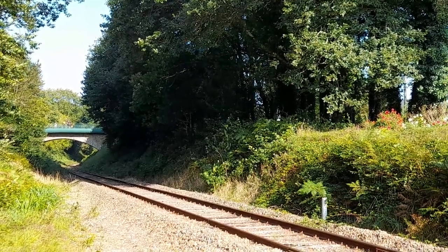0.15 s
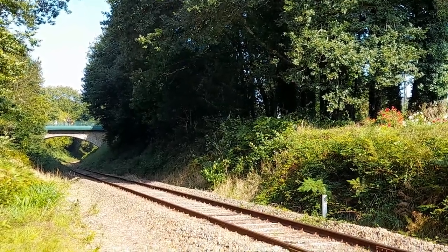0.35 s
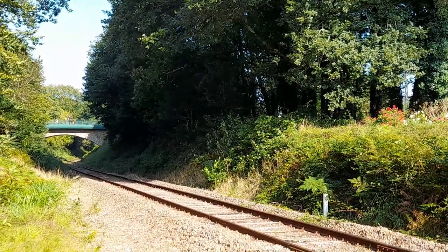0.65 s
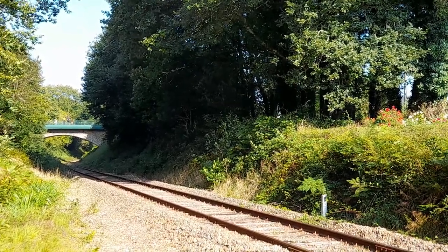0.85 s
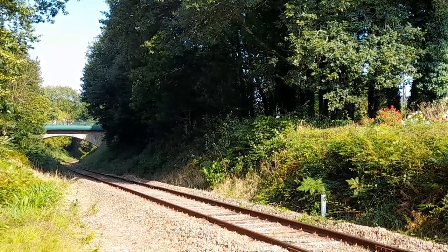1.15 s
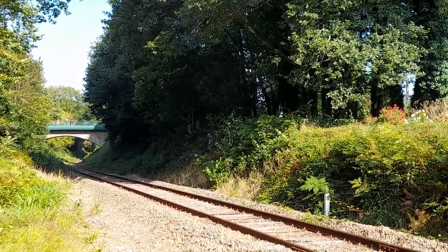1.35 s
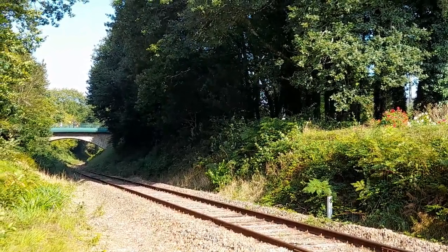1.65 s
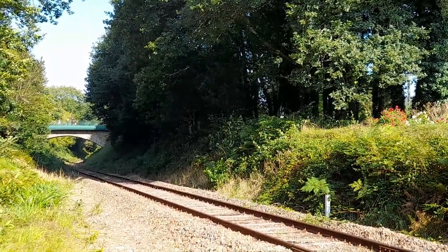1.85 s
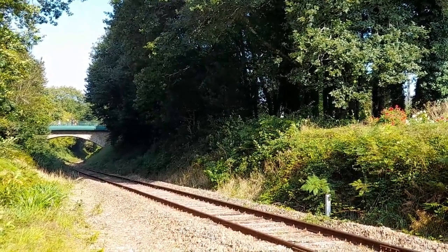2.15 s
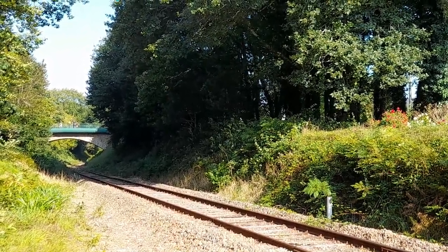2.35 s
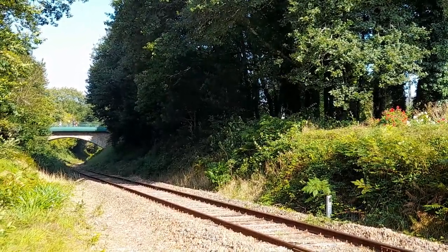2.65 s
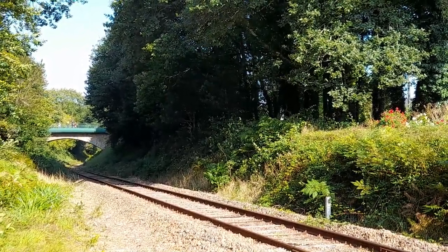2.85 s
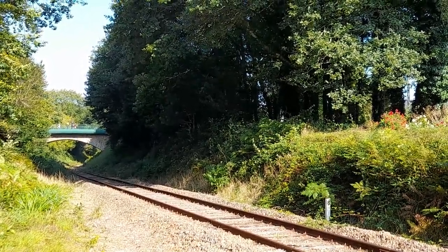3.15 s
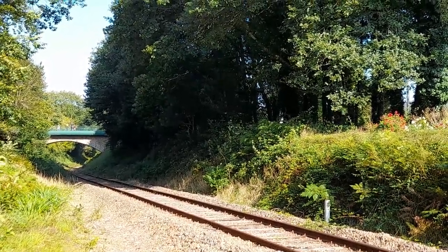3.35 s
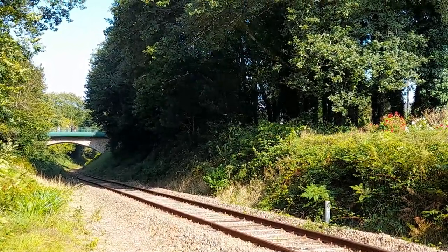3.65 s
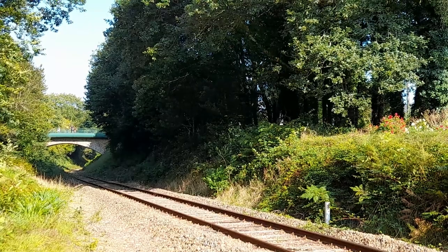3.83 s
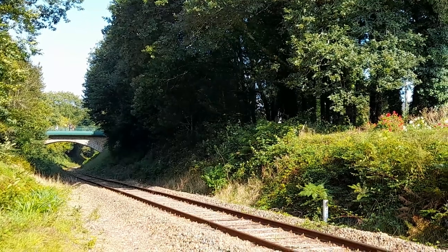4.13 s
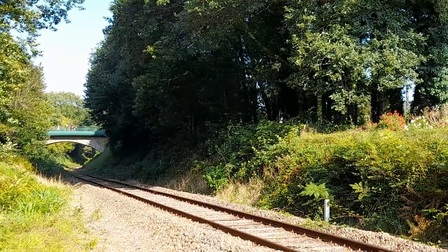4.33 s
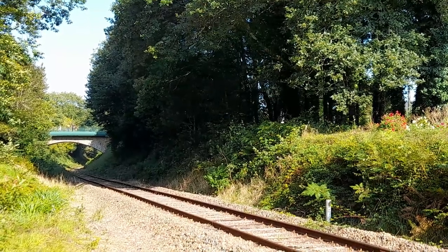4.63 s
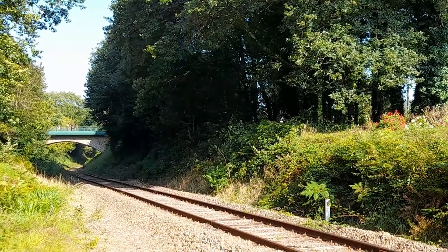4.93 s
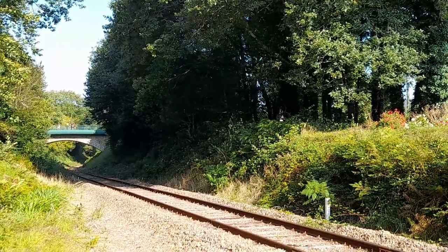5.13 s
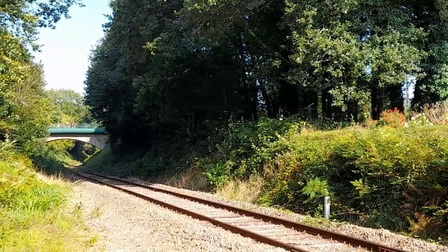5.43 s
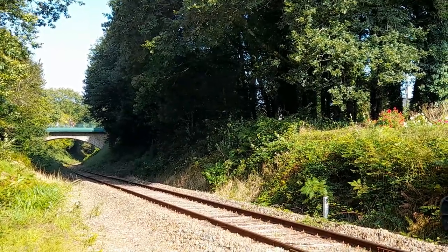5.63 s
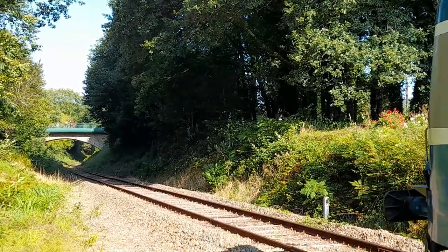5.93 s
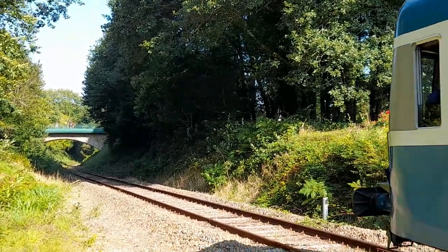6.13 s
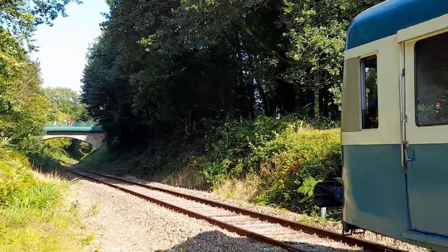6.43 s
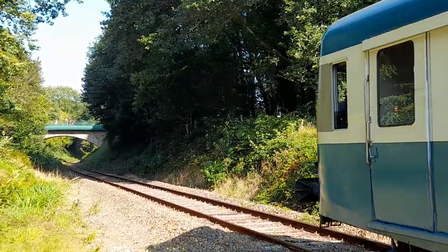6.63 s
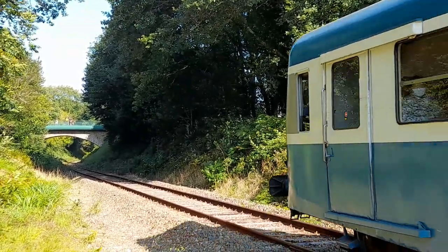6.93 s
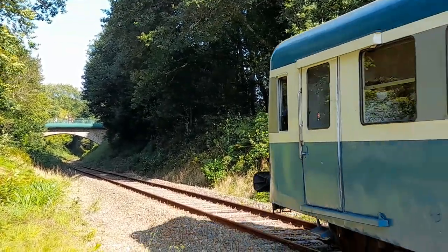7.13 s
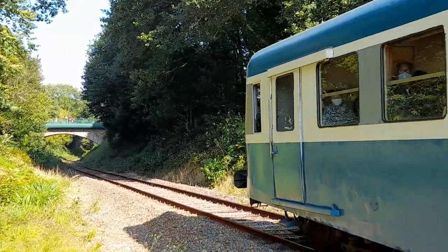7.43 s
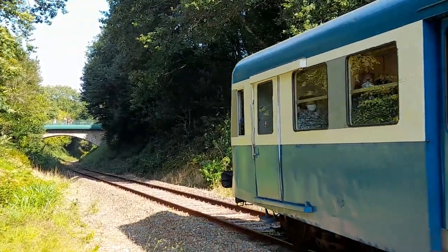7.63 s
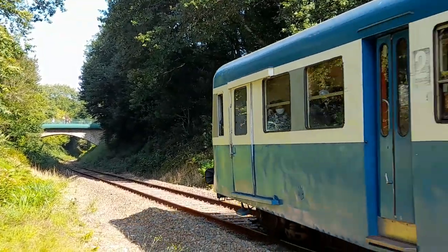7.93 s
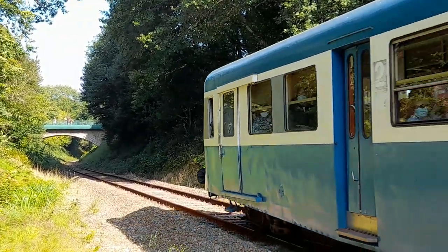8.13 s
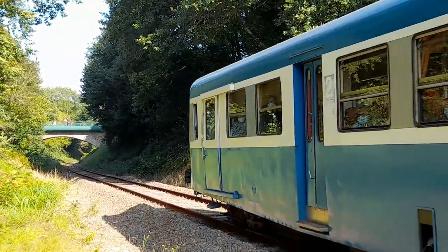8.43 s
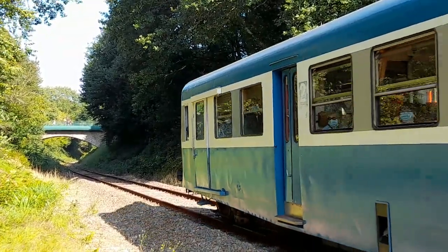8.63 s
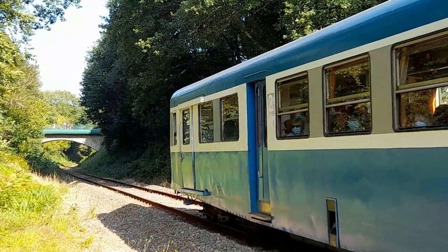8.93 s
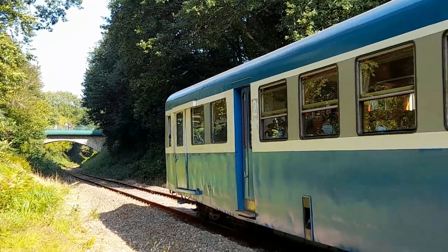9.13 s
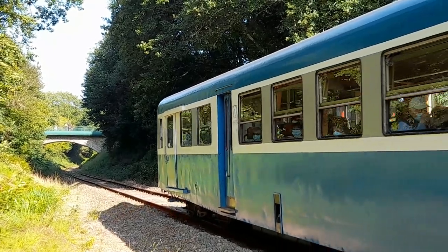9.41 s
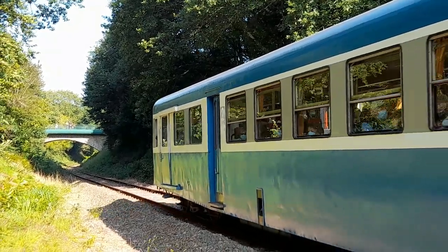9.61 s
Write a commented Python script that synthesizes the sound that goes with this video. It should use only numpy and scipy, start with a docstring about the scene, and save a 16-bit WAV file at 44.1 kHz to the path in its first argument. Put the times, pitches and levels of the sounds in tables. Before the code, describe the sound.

A diesel train approaches at idle, surges into power and rolls by with booming exhaust, humming panels and rattling metal.

```python
"""An old diesel railcar creeps up from behind and rolls past, close to a rural track lined with trees.
Its twelve cylinders knock unevenly at low load, each firing ringing the block and the exhaust pipe.
At four seconds it takes power: the exhaust booms, the turbocharger whistles higher, body panels hum
and the cooling fan starts to drone. Wheels rumble on rough rails, flanges rasp and loose metal clinks;
early gusts touch the microphone."""
import sys
import numpy as np
from scipy import signal
from scipy.fft import rfft, irfft, next_fast_len
from scipy.io import wavfile
from scipy.ndimage import uniform_filter1d

SR = 44100
rng = np.random.default_rng(int(sys.argv[2]) if len(sys.argv) > 2 else 0)


def wav_record(signal):
    """Record a signal, one row per channel, as 16-bit PCM in the file named by sys.argv[1]."""
    frames = np.transpose(np.atleast_2d(signal))
    bounded = np.clip(frames, -1, 1)
    # unit amplitude maps onto the largest positive 16-bit level
    quanta = np.round(bounded * 32767).astype(np.int16)
    wavfile.write(sys.argv[1], SR, quanta)


N = 430857
TIME = np.arange(N) / SR
SPEED_M_PER_S, NOSE_ABREAST_S = 4, 5
# cylinders in firing order: idle level/dB, loaded level/dB, lateness/firing intervals
CYLINDERS = [(0, -5, .13), (-5.5, -16, 0.18), (-17, -9.5, 0.11), (-10, -9, 0.11), (-2, -2, 0.2013),
             (-11, -2, 0.16), (-20, -14, 0.048), (-19.5, -19, 0.243), (-10.5, -4.5, 0.269), (-7, -10, 0.22),
             (-16.5, -14.5, 0.263), (-34.5, -11.5, .15)]


def from_db(db):
    return 10 ** (np.asarray(db) / 20)


def rms_one(x):
    return x / np.sqrt(np.mean(x ** 2) + 1e-20)


def in_time(rows):
    """Each column of a breakpoint curve at every sample."""
    times, *columns = np.transpose(rows)
    return [np.interp(TIME, times, column) for column in columns]


def swell(s, length):
    """A bell-shaped rise and fall that peaks at s."""
    return np.exp(-.5 * ((TIME - s) / length) ** 2)


def drift(rate_hz):
    """Smooth random modulation, spread 1."""
    step, settle = 40, 2000
    pole = np.exp(-2 * np.pi * rate_hz * step / SR)
    noise = rng.standard_normal(N // step + settle + 2)
    slow = signal.lfilter([1], [1, -2 * pole, pole * pole], noise)[settle:]
    return np.interp(np.arange(N) / step, np.arange(len(slow)), rms_one(slow))


def breathy(angle, blur_hz):
    """A tone whose strength and phase wander."""
    return drift(blur_hz) * np.sin(angle) + drift(blur_hz) * np.cos(angle)


def colour(x, spectrum):
    """EQ by a curve of (f/Hz, level/dB), rolling off beyond its ends; rms 1."""
    size = next_fast_len(N)
    hz, db = np.transpose(spectrum)
    bins = np.maximum(np.fft.rfftfreq(size, 1 / SR), 1)
    curve = from_db(np.interp(np.log(bins), np.log(hz), db))
    skirts = np.minimum(1, bins / hz[0]) ** 2 * np.minimum(1, hz[-1] / bins) ** 2
    return rms_one(irfft(rfft(x, size) * curve * skirts, size)[..., :N])


def resonate(x, modes, ratio=-1):
    """Parallel modes (f/Hz, width/Hz, level/dB), the kth times ratio**k; positive firms the attack."""
    out = 0
    for k, (hz, width, db) in enumerate(modes):
        r = np.exp(-np.pi * width / SR)
        ring = signal.lfilter([1, 0, -1], [1, -2 * r * np.cos(2 * np.pi * hz / SR), r * r], x)
        out = out + ratio ** k * from_db(db) * (1 - r * r) / 2 * ring
    return out


def ports(x):
    """Sound from the right reaches the left microphone port later."""
    # delay of the left port: t/s, lag/ms
    port_lag = [(0, 0.27), (5.4, 0.33), (7, 0.32), (9.77, 0.46)]
    lag_ms, = in_time(port_lag)
    return np.array([np.interp(TIME - lag_ms / 1000, TIME, x), x])


def wide_noise(direct):
    """Stereo white noise: a direct share of the power, the rest scattered."""
    focused = ports(rng.standard_normal(N))
    return np.sqrt(direct) * focused + np.sqrt(1 - direct) * rng.standard_normal((2, N))


def trees(x, t60, wet_db):
    """Direct sound plus a short scatter from the bank and the trunks."""
    t = TIME[:SR // 2]
    tail = rng.standard_normal((2, len(t))) * from_db(-60 * t / t60) * (t > .008)
    tail /= np.sqrt(np.sum(tail ** 2, axis=1, keepdims=True))
    return ports(x) + from_db(wet_db) * signal.fftconvolve(x[None], tail, axes=1)[:, :N]


def past(behind_m):
    """Metres by which a point behind the nose has gone past the microphone."""
    return SPEED_M_PER_S * (TIME - NOSE_ABREAST_S) - behind_m


def passing(behind_m, reach_m):
    """Pass-by gain: 1 when abreast, half the power at its reach, then falling with distance."""
    return 1 / np.hypot(1, past(behind_m) / reach_m)


def effort(load, idle_db, power_db):
    """Crossfade of gain from idle to full power."""
    return from_db(idle_db) * (1 - load) + from_db(power_db) * load


def surge(hold_s, start_s=4.02, attack_s=0.085, release_s=0.28):
    """Envelope of the engine's surge as the throttle opens, 0-1."""
    corners = start_s + np.cumsum([0, attack_s, hold_s, release_s])
    return np.interp(TIME, corners, [0, 1, 1, 0]) ** 2


def build_up(load, lag_s):
    """Boost and fan drive creep up after the load."""
    pole = np.exp(-1 / (lag_s * SR))
    return signal.lfilter([1 - pole], [1, -pole], load)


def firings(firing_count, load, uneven_db):
    """One click per firing; each cylinder has its own strength and path down the manifold."""
    number = np.arange(np.ceil(firing_count[0]), np.floor(firing_count[-1]) - 1)
    idle_db, loaded_db, late = np.array(CYLINDERS)[number.astype(int) % len(CYLINDERS)].T
    at = np.minimum(np.searchsorted(firing_count, number + late), N - 1)
    level_db = idle_db + (loaded_db - idle_db) * load[at]
    clicks = np.zeros(N)
    clicks[at] = from_db(level_db + uneven_db * rng.standard_normal(len(at)))
    return clicks


def puffs(clicks, decay_s):
    """The envelope of bursts that die away after each click; rms 1."""
    return rms_one(signal.lfilter([1], [1, -np.exp(-1 / (decay_s * SR))], clicks))


def combustion(clicks, modes, turbulence_db, band_hz):
    """Pulses and their puffs of gas ring a set of resonances; the casing passes only the middle band."""
    gas = from_db(turbulence_db) * puffs(clicks, decay_s=0.011) * rng.standard_normal(N)
    casing = signal.butter(2, band_hz, "band", fs=SR, output="sos")
    rung = signal.sosfilt(casing, resonate(rms_one(clicks) + gas, modes, ratio=0.77))
    return rung / np.sqrt(uniform_filter1d(rung ** 2, size=SR // 2) + 1e-12)  # even out the level


def knock(clicks, boost):
    """The block knocks hard at idle and softens as the boost builds."""
    # engine block resonances: f/Hz, width/Hz, level/dB
    block = [(278, 22, 0), (325.5, 30, -2), (381, 24, 6.5), (402, 70, -7), (487, 12, 8), (620, 20, -9),
             (650, 14, -2), (741.5, 6.9, 7)]
    # the hardest knocks before the throttle opens: t/s, accent/dB
    hard_knocks = [(.415, 0), (2.205, 3.5), (3.03, 1), (3.443, 2.5), (3.582, 1), (3.72, 1.5), (3.766, 5.5),
                   (3.996, 4.5)]
    accents = from_db(sum(db * swell(s, .012) for s, db in hard_knocks))
    gain = accents * effort(boost, idle_db=-32.5, power_db=-45) * passing(behind_m=28.4, reach_m=24.4)
    knocks = combustion(clicks, block, turbulence_db=-10, band_hz=[262, 600])
    return trees(gain * knocks, t60=0.34, wet_db=-16)


def bark(clicks, load):
    """The exhaust pipe speaks up under load, and roars with a rush of gas in the surge."""
    # exhaust pipe resonances: f/Hz, width/Hz, level/dB
    pipe = [(245, 240, -25), (292.5, 25, 3.5), (335, 96, 1), (396, 52, 0), (498, 22, -9.5),
            (648, 190, -16.5)]
    # EQ of the rushing gas: f/Hz, level/dB
    roar_eq = [(220, -31), (275, -1), (330, -7), (410, -5), (500, -13), (720, -21), (900, -25)]
    gain = effort(load, idle_db=-53, power_db=-35) * passing(behind_m=6.2, reach_m=6.4)
    gain += from_db(-36) * surge(hold_s=0.13)
    roar = from_db(-30.5) * surge(hold_s=0.099) * colour(wide_noise(direct=0.85), roar_eq)
    pulses = combustion(clicks, pipe, turbulence_db=-4, band_hz=[219, 604])
    return trees(gain * pulses, t60=0.34, wet_db=-6) + roar


def boom(firing_count, load):
    """The firing tone, loudest at the exhaust outlet: it stumbles at idle and steadies under load."""
    # brief dips in the tone: t/s, length/s, level/dB
    dips = [(.2, 1, -12), (3.8, 0.11, -7), (4.418, 0.022, -17), (5.23, 0.07, -6), (6.69, .02, -14),
            (8.256, 0.13, -10)]
    gain = effort(load, idle_db=-10, power_db=-12) * passing(behind_m=21.85, reach_m=2.77)
    gain += from_db(-25) * surge(hold_s=0.27)
    gain *= from_db(sum(db * swell(s, length) for s, length, db in dips))
    stumble = .42 - .3 * load
    angle = 2 * np.pi * firing_count
    return ports(gain * (np.sin(angle) + stumble * breathy(angle, blur_hz=21.9)))


def clatter(firing_count, load, uneven_db):
    """Injectors and tappets: a bright burst at every firing, over the rush of intake air."""
    # EQ of the clatter and the intake: f/Hz, level/dB
    clatter_eq = [(400, 4), (800, 4.5), (1200, -7.5), (1600, 2), (2100, 2), (3200, -4), (4200, -2.5),
                  (6000, -7.5), (7000, -14), (8000, -38.5), (10000, -21.5), (12500, -19.5), (16000, -26.5)]
    # engine bay resonances: f/Hz, width/Hz, level/dB
    bay_modes = [(1180, 267, 1), (1432, 380, -3.5), (2100, 180, -16.5), (3320, 250, -14),
                 (11700, 1400, -31.5)]
    fired = np.diff(np.floor(firing_count), prepend=np.floor(firing_count[0])) > 0
    clicks = fired * from_db(uneven_db * rng.uniform(-1, 1, N))
    bursts = rms_one(1 + puffs(clicks, decay_s=0.015))
    gain = effort(load, idle_db=-49.5, power_db=-47.5) * passing(behind_m=10.3, reach_m=17.8)
    # the surge draws a smooth gulp of air
    gulp = from_db(-46) * surge(hold_s=0.2) * colour(wide_noise(direct=0.15), clatter_eq)
    # the open bay rings with the bursts, loud only once it is alongside
    ringing = rms_one(resonate(wide_noise(direct=0.93) * bursts, bay_modes))
    bay = from_db(-43) * passing(behind_m=18.1, reach_m=5.4) * ringing
    return gain * colour(wide_noise(direct=0.17) * bursts, clatter_eq) + gulp + bay


def turbo(clicks, load, blur_hz, octave_blur_hz, throb):
    """The turbocharger's breathy whistle and its octave, throbbing with the exhaust pulses."""
    # whistle pitch as the turbo spools up: t/s, f/Hz
    spool = [(0.0, 4965), (3.89, 5066), (4.98, 5530), (6.07, 5810), (9.28, 6220), (9.77, 6290)]
    # swells of the airy octave: t/s, length/s, level/dB relative to the whistle
    airy_swells = [(5.9, 0.34, -14), (8.843, 0.66, -15)]
    hz, = in_time(spool)
    gain = effort(load, idle_db=-57, power_db=-54) * passing(behind_m=15.5, reach_m=22.3)
    gain += from_db(-54) * surge(hold_s=0.18)
    angle = 2 * np.pi * np.cumsum(hz) / SR
    octave = sum(from_db(db) * swell(s, length) for s, length, db in airy_swells)
    whistle = [breathy(angle, blur_hz) + octave * breathy(2 * angle, octave_blur_hz) for ear in range(2)]
    return gain * rms_one(1 + throb * puffs(clicks, decay_s=0.0066)) * np.array(whistle)


def wheels():
    """Rough rails shake the wheels and the body; the floor drums as the middle of the car goes by."""
    # EQ of the rolling rumble: f/Hz, level/dB
    rumble_eq = [(20, -24), (35, -16.5), (52, -6), (80, -1), (128, -2.5), (185, -14), (250, -8.5),
                 (350, -10), (470, -14.5), (750, -17.5), (1000, -30.5), (2000, -59)]
    # floor resonance: f/Hz, width/Hz, level/dB
    floor_mode = [(214, 37, 0)]
    gain = from_db(-30 + 1.9 * drift(33)) * passing(behind_m=20, reach_m=19)
    floor_gain = from_db(-40.5) * passing(behind_m=11.5, reach_m=5.8) ** 2
    drumming = floor_gain * rms_one(resonate(wide_noise(direct=0.8), floor_mode))
    return gain * colour(wide_noise(direct=0.59), rumble_eq) + drumming


def rattle(per_s, width_hz):
    """Loose metal parts clink at random and in bunches, all along the body and hardest near the engine."""
    # the ring of each part: f/Hz, level/dB
    parts = [(1720, 3), (1810, -3.5), (1890, -1.5), (1990, 3), (2070, 0), (2160, 2), (2260, -11),
             (2370, -1), (2490, -7.5), (2620, -2.5), (2760, -6), (2930, -5.5), (3150, -7)]
    gain = from_db(-56.5) * passing(behind_m=3.1, reach_m=27)
    gain += from_db(-57) * passing(behind_m=14.4, reach_m=0.79)
    gain += from_db(-53) * surge(hold_s=0.16)
    bunches = from_db(2 * drift(4))
    out = 0
    for hz, db in parts:
        hits = (rng.random(N) < per_s / SR) * rng.uniform(-0.94, 1, (2, N)) * bunches
        wide_hits = ports(hits[0]) + 0.46 * hits[::-1]
        out = out + resonate(wide_hits + 1e-18, [(hz, width_hz, db)])
    return gain * rms_one(out)


def wind():
    """Lumpy gusts on the microphone and a faint hiss of air."""
    # gusts: t/s, length/s, level/dB
    gusts = [(0.426, 0.086, -29), (0.417, 0.028, -38), (0.757, 0.066, -31.5), (1.144, 0.032, -27.5),
             (1.285, 0.0073, -26.5), (1.36, 0.022, -31.5), (1.574, 0.058, -33), (1.945, 0.076, -27.5),
             (2.3, 0.024, -26), (2.35, 0.013, -39), (2.463, 0.18, -38.5), (2.806, 0.016, -32.5)]
    # EQ of the buffeting: f/Hz, level/dB
    gust_eq = [(20, -28), (58, 1), (115, 2.5), (300, -8.5), (600, -22), (1500, -44), (5000, -79)]
    # EQ of the hiss: f/Hz, level/dB
    air_eq = [(100, -17.5), (1000, 9), (5000, -12), (8000, -7), (12000, -4), (16000, -10)]
    lumps = from_db(2.5 * drift(40) - 1)
    gain = lumps * sum(from_db(db) * swell(s, length) for s, length, db in gusts)
    buffeting = gain * colour(wide_noise(direct=0.29), gust_eq)
    return buffeting + from_db(-63) * colour(wide_noise(direct=0.043), air_eq)


def clanks(burst_decay_s, ring_decay_s):
    """The running gear clanks a few times: a metallic burst of noise and one ringing tone."""
    # clanks: t/s, burst level/dB, tilt/dB per octave, ring f/Hz, ring level/dB
    hits = [(0.886, -52, 9, 3900, -57), (7.712, -54, -5, 829, -33.5), (7.728, -44.5, -7, 1825, -39),
            (7.747, -54, -16, 2600, -53), (7.844, -46.5, 3, 1820, -39)]
    # running gear resonances: f/Hz, width/Hz, level/dB
    metal = [(860, 24, -7), (1880, 95, -5), (2630, 160, -3), (3800, 99, -0.5)]
    out, shake = 0, wide_noise(direct=0.21)
    for s, db, tilt_db, ring_hz, ring_db in hits:
        age = np.maximum(TIME - s, 0)
        ring = from_db(ring_db) * np.exp(-age / ring_decay_s) * np.sin(2 * np.pi * ring_hz * age)
        modes = [(hz, width, mode_db + tilt_db * np.log2(hz)) for hz, width, mode_db in metal]
        burst = from_db(db) * (TIME > s) * np.exp(-age / burst_decay_s) * rms_one(resonate(shake, modes))
        out = out + ports(ring) + burst
    return out


def flanges(blur_hz, grip_db):
    """A flange grips and slips on the rail, rasping in a wheel resonance that sinks slowly."""
    # rasps: peak t/s, length/s, f/Hz, glide/octaves per s, level/dB
    rasps = [(1.35, 0.33, 2510, -.1, -64), (3.78, 0.28, 1950, -.3, -58.5), (6.35, .2, 2094, -.1, -59),
             (8.23, 0.08, 2100, -.15, -56), (8.56, 0.1, 2187, -.15, -56)]
    out = 0
    for s, length, hz, glide, db in rasps:
        pitch_hz = hz * 2 ** (glide * np.clip(TIME - s, -1, 1))
        angle = 2 * np.pi * np.cumsum(pitch_hz) / SR
        grip = from_db(grip_db * drift(60))
        out = out + from_db(db) * swell(s, length) * rms_one(grip * breathy(angle, blur_hz))
    return trees(out, t60=0.17, wet_db=3)


def chink(ring_s, tap_s, tap_db):
    """A loose metal fitting chatters: each touch is a sharp tap, and the ringing builds up and lingers."""
    # touches: t/s, level/dB
    touches = [(2.300, -55), (2.311, -55), (2.349, -50), (2.362, -58), (2.379, -54), (2.411, -60)]
    # resonances of the fitting: f/Hz, width/Hz, level/dB
    modes = [(4690, 80, 6.5), (5000, 120, 0), (7260, 110, -3.5), (9500, 400, -16), (10450, 130, -11),
             (11280, 100, -6), (12750, 250, -10.5), (13750, 70, -3), (14950, 150, -14)]
    power = 0
    for s, db in touches:
        age = np.maximum(TIME - s, 0)
        envelope = np.exp(-age / ring_s) + from_db(tap_db) * np.exp(-age / tap_s)
        power = power + (TIME > s) * (from_db(db) * envelope) ** 2
    return np.sqrt(power) * rms_one(resonate(wide_noise(direct=0.1), modes, ratio=0.94))


def panels(firing_count, load):
    """Unequal cylinders make the loaded body hum at multiples of the whole engine cycle."""
    # panel hums swelling as they go by: multiple of the cycle rate (gets rounded), t/s, length/s, level/dB
    hums = [(9, 6.3, 1.2, -37), (14, 8.7, 0.53, -40.5), (21, 8.4, 1.4, -44.5), (24, 8.1, 0.85, -39),
            (26, 7.4, .9, -43), (27, 7.8, .7, -44.5), (31, 7.6, 2, -39.5), (34, 6.2, 0.82, -39.5),
            (34, 10.31, 1.06, -30.5), (35, 4.2, 0.046, -28), (36, 8.8, 0.39, -35), (38, 6.1, 0.45, -38),
            (41, 6, 0.52, -46), (47, 8, 0.37, -44.5), (47, 5.1, 0.96, -41.5), (49, 8, 0.41, -39),
            (50, 7.62, 0.55, -41), (50, 5.35, 0.8, -42.5), (68.4, 9.65, 0.17, -35), (67.9, 7.55, 1.4, -44),
            (102.4, 6.5, 1.4, -53.5), (103.2, 6.8, 0.71, -59)]
    cycle = 2 * np.pi * firing_count / len(CYLINDERS)
    out = 0
    for multiple, s, length, db in hums:
        waver = from_db(1.4 * drift(7))
        tone = np.sin(round(multiple) * cycle + 2 * np.pi * rng.random())
        out = out + from_db(db) * waver * swell(s, length) * tone
    return ports(np.sqrt(2) * load * out)


def fan(firing_count, boost, blades_per_firing):
    """The cooling fan's blade tone and overtones, geared to the crankshaft, wavering in the air flow."""
    # fan tones: harmonic, level/dB, loudest point behind the nose/m, reach ahead/m, reach astern/m
    tones = [(1, -28.5, 13.16, 2.2, 1.76), (1, -43, 2.7, 1.5, 1.2), (2, -36, 12.7, 1.46, 3.3),
             (2, -38.5, 3.9, 1.6, 1.16), (3, -41, 14.9, 2.16, 3.1), (4, -59.5, 27, 8.2, 6),
             (5, -54, 9, 1.9, 2.6)]
    angle = 2 * np.pi * blades_per_firing * firing_count
    out = 0
    for harmonic, db, behind_m, ahead_m, astern_m in tones:
        reach_m = np.where(past(behind_m) < 0, ahead_m, astern_m)
        gain = boost * passing(behind_m, reach_m) * from_db(db + 2.2 * drift(10))
        out = out + gain * np.sin(harmonic * angle + 0.24 * drift(8.4))
    return ports(np.sqrt(2) * out)


def gears(firing_count):
    """Each whine swells as its gearing goes by."""
    # gear whines: multiple of the firing rate, peak t/s, length/s, level/dB, blur/Hz
    whines = [(39.4, 4.93, 0.06, -58, 80), (40.8, 5.08, .2, -60, 100), (40.8, 5.72, 0.16, -56.5, 100),
              (38.6, 6.0, 0.18, -57.5, 130)]
    out = 0
    for multiple, s, length, db, blur_hz in whines:
        out = out + from_db(db) * swell(s, length) * breathy(2 * np.pi * multiple * firing_count, blur_hz)
    return ports(out)


def scene():
    """The engine's firings set the pulse of the pass-by; the railcar is on the right."""
    # throttle: t/s, firing rate/Hz, load 0-1
    throttle = [(0, 87.12, 0), (4.02, 87.12, 0), (4.18, 95.3, .7), (4.4, 101.75, 1), (7.3, 101.82, 1),
                (8.6, 101.63, 1), (9.77, 101.45, 1)]
    firing_hz, load = in_time(throttle)
    boost = build_up(load, lag_s=0.6)
    firing_count = np.cumsum(firing_hz) / SR
    firing_count -= np.interp(.1343, TIME, firing_count)  # an engine cycle starts at this time
    clicks = firings(firing_count, load, uneven_db=1.2)
    body = knock(clicks, boost) + bark(clicks, load) + boom(firing_count, load)
    body += panels(firing_count, load) + fan(firing_count, boost, blades_per_firing=1.853)
    body += gears(firing_count) + wheels()
    top = clatter(firing_count, load, uneven_db=10.5) + rattle(per_s=35, width_hz=33)
    top += turbo(clicks, load, blur_hz=129, octave_blur_hz=480, throb=0.57)
    top += flanges(blur_hz=230, grip_db=8)
    top += clanks(burst_decay_s=0.038, ring_decay_s=0.03) + chink(ring_s=0.06, tap_s=.002, tap_db=3)
    # the bright layers lean further right
    return body * from_db([[-.25], [.25]]) + top * from_db([[-.9], [.9]]) + wind()


def record(dry):
    """A steep low-pass trims the very top."""
    cutoff_hz = 16450
    return signal.sosfilt(signal.ellip(10, .1, 80, cutoff_hz, fs=SR, output="sos"), dry)


dry = scene()
out = record(dry)
wav_record(out)
```